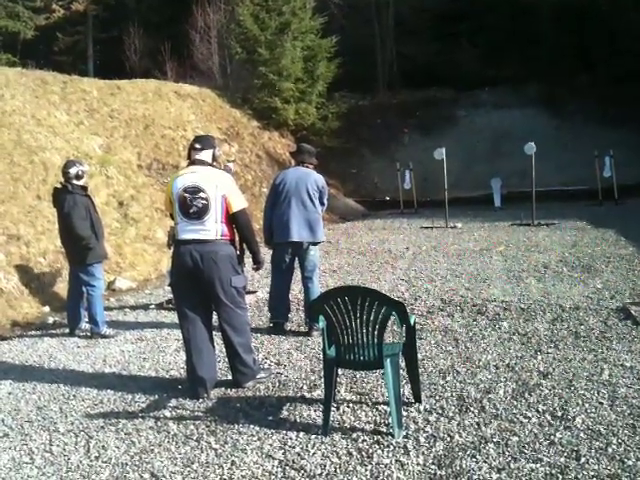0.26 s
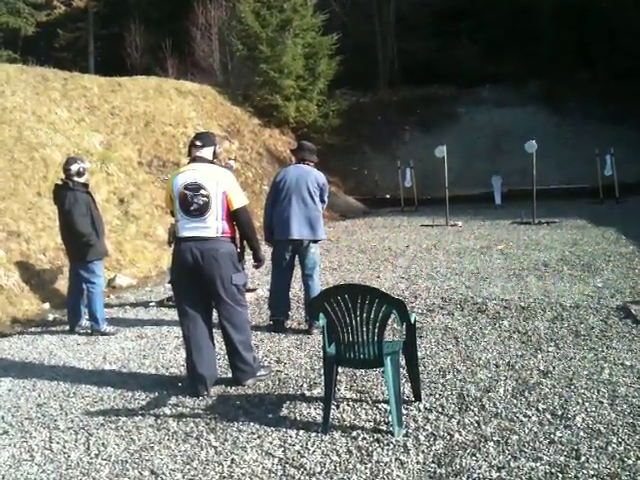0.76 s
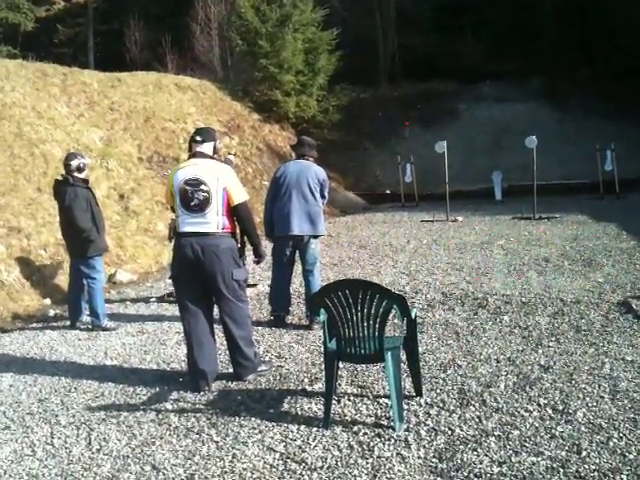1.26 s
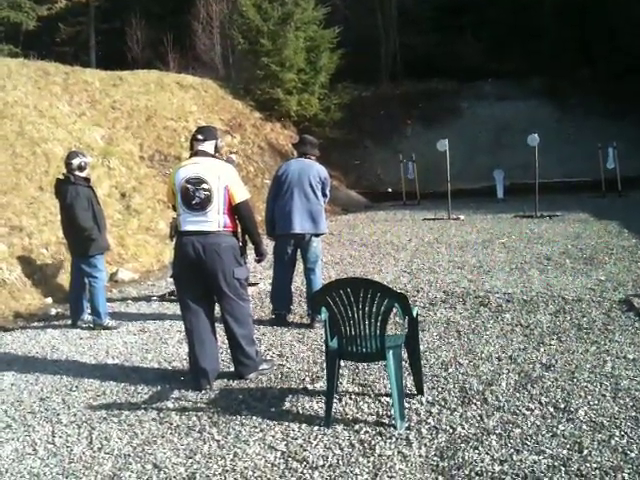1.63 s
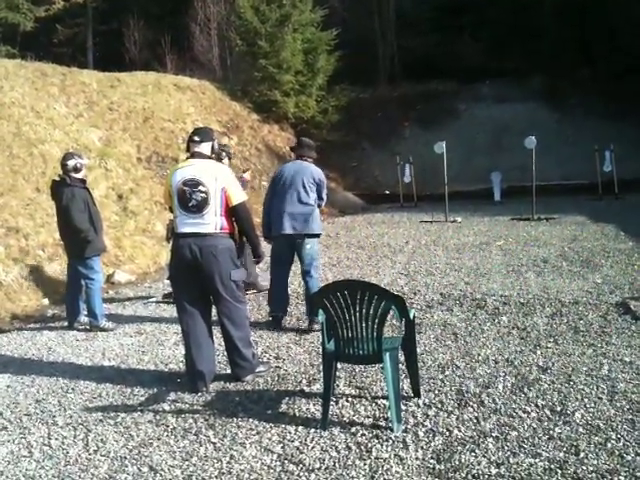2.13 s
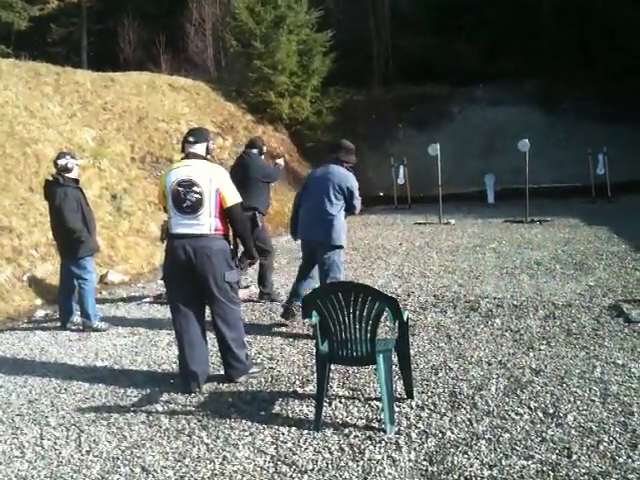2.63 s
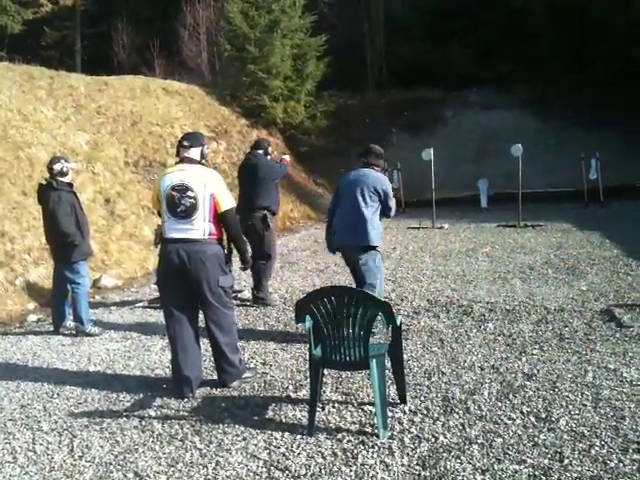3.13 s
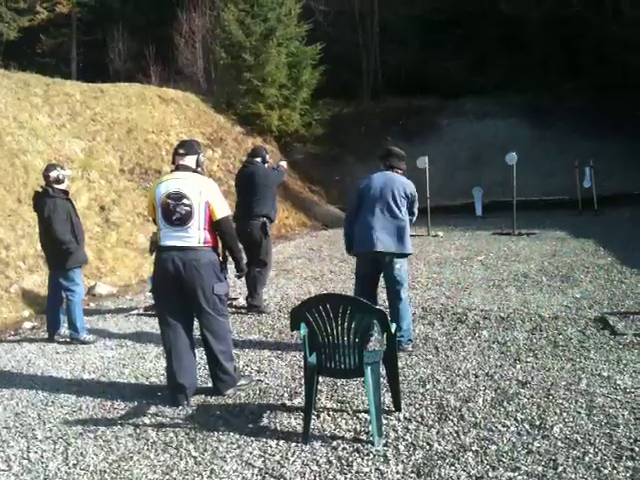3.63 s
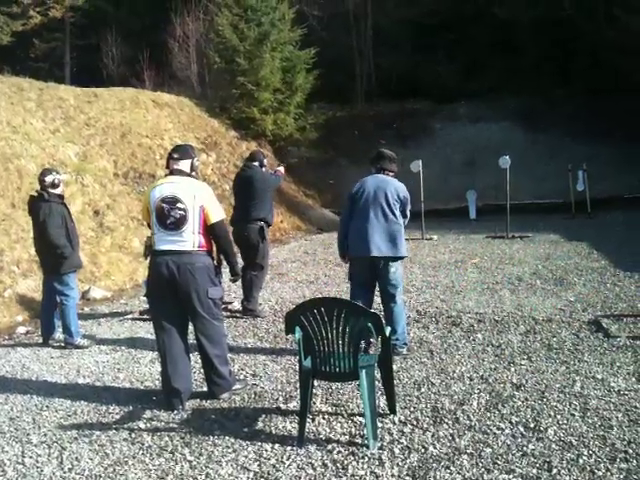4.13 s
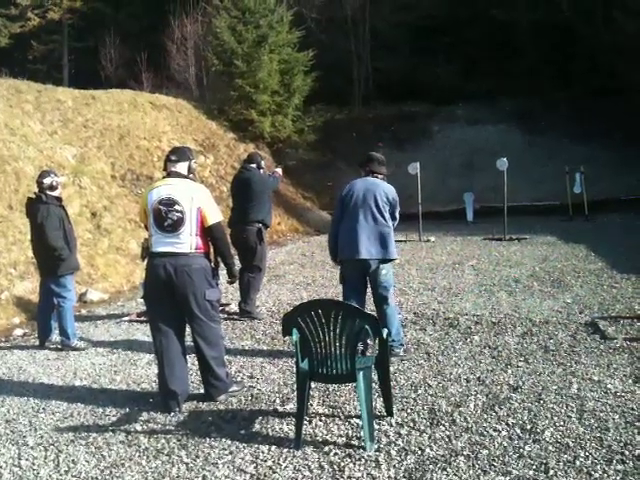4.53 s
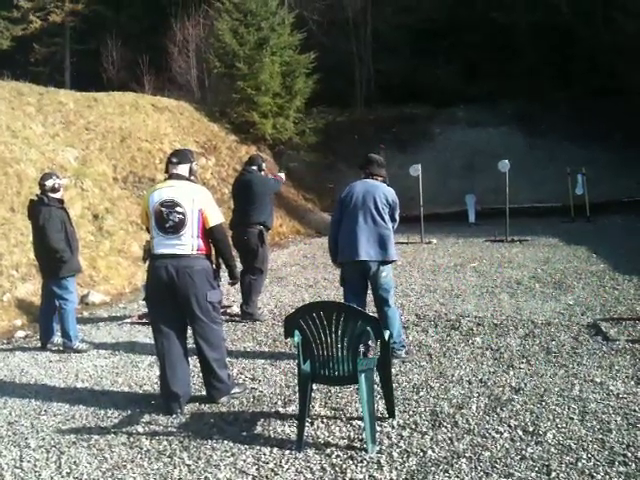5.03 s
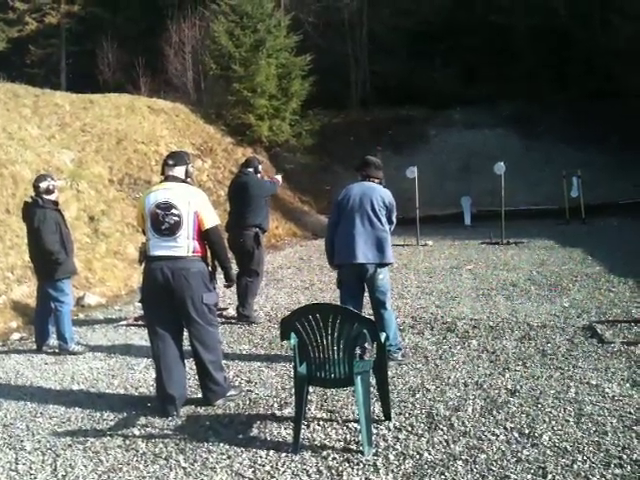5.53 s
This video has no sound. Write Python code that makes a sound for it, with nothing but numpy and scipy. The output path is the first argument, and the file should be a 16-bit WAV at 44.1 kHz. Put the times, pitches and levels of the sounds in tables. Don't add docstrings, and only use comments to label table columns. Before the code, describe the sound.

Close pistol shots crack and overload the microphone, echoing off earth banks and forest, while other guns thump nearby and steel plates ring.

```python
import sys
import numpy as np
from scipy import signal
from scipy.fft import rfft, irfft
from scipy.io import wavfile

SR = 44100
rng = np.random.default_rng(int(sys.argv[2]) if len(sys.argv) > 2 else 0)


def gain_from_db(level_db):
    decades = np.asarray(level_db, float) / 20
    return 10 ** decades


def unload_wav(signal):
    wavfile.write(
        sys.argv[1],
        SR,
        np.round(np.clip(np.atleast_2d(signal).T, -1, 1) * 32767).astype(np.int16),
    )


N = 254898
T = np.arange(N) / SR
BANDS_HZ = 60 * 2 ** np.arange(0, 8.6, .5)


def on_log(table, hz):
    table = np.array(table)
    return np.interp(np.log(hz), np.log(table[:, 0]), table[:, 1])


def bands(noise, colour):
    hz = np.maximum(np.arange(len(noise) // 2 + 1) * SR / len(noise), 1)
    away = np.clip(np.log2(hz / BANDS_HZ[:, None]) * 2, -1, 1)
    coloured = rfft(noise) * gain_from_db(on_log(colour, hz))
    split = irfft(coloured * np.cos(away * np.pi / 2) ** 2, len(noise))
    return split / split.sum(axis=0).std()


def swell(t, rise_s, t60_s):
    t = np.maximum(t, 0)
    rise = np.sin(np.minimum(t / max(rise_s, 1 / SR), 1) * np.pi / 2) ** 2
    return rise * 10 ** (-6 * np.maximum(t - rise_s, 0) / t60_s)


def add(out, sound, start_s):
    i = int(round(start_s * SR))
    out[i:i + len(sound)] += sound[:len(out) - i]


def ring(modes, rise_s, size):
    t = np.arange(size) / SR
    out = np.zeros(size)
    for hz, db, t60_s in modes:
        out += gain_from_db(db) * np.sin(2 * np.pi * hz * t) * np.sqrt(swell(t, rise_s, t60_s))
    return out


def thumps(rows, size):
    out = np.zeros(size)
    for s, push, hz, t60_s in rows:
        add(out, push * ring([(hz, 0, t60_s)], 1 / (3 * hz), size=8192), s)
    return out


# pitch_hz, t60_s
FOREST = [(100, 2), (260, 1.47), (700, 1.67), (2300, 1.38), (4850, 0.91), (9000, 0.64), (12800, 0.49),
          (16000, .4)]


def echoes(t, waves, tails):
    octaves = np.log2(BANDS_HZ[:, None] / 1000)
    power = np.zeros((len(BANDS_HZ), len(t)))
    for s, rise_s, t60_s, db, tilt_db in waves:
        span = slice(*np.searchsorted(t, [s, s + rise_s + 1.5 * t60_s]))
        decay_s = t60_s * 2 ** (-.12 * octaves)
        power[:, span] += gain_from_db(db + tilt_db * octaves) ** 2 * swell(t[span] - s, rise_s, decay_s)
    for s, rise_s, db in tails:
        span = slice(*np.searchsorted(t, [s, s + 2]))
        power[:, span] += gain_from_db(db) ** 2 * swell(t[span] - s, rise_s, on_log(FOREST, BANDS_HZ)[:, None])
    return np.sqrt(power)


# pitch_hz, density_db_per_hz
AIR = [(35, -78.5), (60, -55), (140, -16), (300, -5.5), (460, -6), (800, -0.5), (1400, -6.5), (2350, -5.5),
       (2650, -10), (4700, -9), (6600, -8.5), (9000, -11.5), (12000, -18), (16000, -18.5)]


def scatter(waves, tails):
    return (bands(rng.standard_normal(N), AIR) * echoes(T, waves, tails)).sum(axis=0)


# start_s, end_bank_delay_s, end_bank_db, slopes_db, forest_db
NEAR_SHOTS = [
    (.031, .078, -6.5, -13.5, -19.8),
    (1.405, .074, -11, -7.5, -15.5),
    (3.606, .076, -5.5, -12.5, -19.6),
    (4.738, .084, -12.5, -10, -19.3),
]
# delay_s, rise_s, t60_s, level_db, tilt_db_per_octave
SLOPES = [
    (.039, .024, .17, .1, -3.3),
    (.086, .012, .05, -9, -1.5),
]


def near_gun():
    # delay_s, rise_s, t60_s, level_db, tilt_db_per_octave
    blast, side_banks = (0, .0009, .13, 7, .6), (.031, .015, .23, -3, -.9)
    waves, booms = [], []
    tails = [(-.3, .093, -14)]
    for s, bank_s, bank_db, slopes_db, forest_db in NEAR_SHOTS:
        for delay_s, *shape in (blast, side_banks):
            waves.append((s + delay_s, *shape))
        waves.append((s + bank_s, .003, .2, bank_db, -6))
        for delay_s, rise_s, t60_s, db, tilt_db in SLOPES:
            waves.append((s + bank_s + delay_s, rise_s, t60_s, slopes_db + db, tilt_db))
        tails.append((s + .01, .13, forest_db))
        booms.append((s + .018, .6, 320, .1))
        booms.append((s + bank_s, 1.5 * gain_from_db(bank_db), 316, .1))
    return scatter(waves, tails) + thumps(booms, size=N)


# pitch_hz, density_db_per_hz
QUIET = [(35, -63), (60, -35.5), (91, -22.5), (527, -11.5), (842, -12.5), (5720, -45.5), (8320, -35),
         (16000, -46)]


def hush():
    level_db = -53.5
    return gain_from_db(level_db) * bands(rng.standard_normal(N), QUIET).sum(axis=0)


# start_s, signed_size, pitch_hz, t60_s
LONE_THUMPS = [
    (.5361, -.52, 600, .007),
    (.5368, .28, 300, .036),
    (.5362, -.12, 4300, .003),
    (.5362, -.12, 6500, .003),
    (.5362, -.04, 11500, .002),
]


def lone_gun():
    wave = (.572, .026, .23, -19.5, -1)  # start_s, rise_s, t60_s, level_db, tilt_db_per_octave
    tail = (.537, .16, -24.5)  # start_s, rise_s, level_db
    return scatter([wave], [tail]) + thumps(LONE_THUMPS, size=N)


# start_s, level_db
BAY_SHOTS = [(.6315, 0), (1.0508, -.5), (1.7739, 0), (2.1258, 0), (2.5183, 0), (2.8761, -.5)]
# delay_s, rise_s, t60_s, level_db, tilt_db_per_octave
BAY_WAVES = [(0, 0.00054, .02, -16.5, 3), (.004, 0.0023, 0.3, -14.5, -4.5), (.037, 0.0026, 0.03, -19, 2),
             (0.041, 0.0038, 0.069, -12, -4), (.085, .02, .1, -16, -1), (.103, .004, .04, -19, -1),
             (.12, 0.0087, 0.097, -10, 0)]
# delay_s, signed_size, pitch_hz, t60_s
BAY_THUMPS = [(0, -0.98, 730, 0.0091), (.0004, 0.41, 1270, 0.015), (.008, .25, 1100, 0.033),
              (.0036, 1.19, 298.5, 0.038), (.006, 0.34, 680, 0.024), (.02, 0.34, 556, 0.036),
              (.039, .4, 700, .04), (.044, 0.23, 332, 0.056), (.108, -0.014, 500, .03)]
# pitch_hz, level_db
BAY_SHADE = [(250, -5), (600, .1), (8000, .1), (12000, -3)]


def next_bay():
    out, t = np.zeros(N), T[:65536]
    tail = (0.032, 0.12, -18.5)  # delay_s, rise_s, level_db
    gain = echoes(t, BAY_WAVES, [tail]) * gain_from_db(on_log(BAY_SHADE, BANDS_HZ))[:, None]
    ground = rng.standard_normal(len(t))
    same = .3 + .6 * np.exp(-t / .05)
    thump = thumps(BAY_THUMPS, size=len(t))
    for s, db in BAY_SHOTS:
        noise = same * ground + np.sqrt(1 - same ** 2) * rng.standard_normal(len(t))
        scattered = (bands(noise, AIR) * gain).sum(axis=0)
        add(out, gain_from_db(db) * (thump + scattered), s)
    return out


# start_s, pitch_hz, level_db, t60_s
BAY_PLATES = [(.662, 4470, -15, .029), (.7, 6200, -44, .88), (1.093, 3660, -19.5, .15),
              (1.094, 3801, -27, .9), (1.092, 4530, -21.5, .13), (1.18, 6298, -23.5, .45),
              (1.25, 8683, -34, .4), (1.838, 6160, -26, .58), (1.838, 3570, -19, .07),
              (1.839, 4320, -22, .15), (2.175, 5399, -29, 1.1), (2.175, 5889, -32, 1.5),
              (2.175, 5200, -35, 1.5), (2.25, 3531, -30.5, .88)]


def bay_plates():
    out = np.zeros(N)
    for s, hz, db, t60_s in BAY_PLATES:
        add(out, ring([(hz, db, t60_s)], .002, size=SR), s)
    return out


# start_s, t60_s, level_db
IMPACTS = [(.663, .034, -8), (1.093, .1, -20), (1.142, .02, -16), (1.479, .24, -4), (1.552, .11, -11),
           (1.839, .06, -14), (1.879, .013, -15), (2.178, .12, -21), (2.59, .012, -24), (2.947, .015, -17),
           (4.819, .01, -1)]


def impacts():
    rise_s, tilt_db = .001, .3
    return scatter([(s, rise_s, t60_s, db, tilt_db) for s, t60_s, db in IMPACTS], [])


def strike(pitches_hz, modes, start_s, rise_s):
    out = np.zeros(N)
    add(out, ring(np.column_stack([pitches_hz, modes]), rise_s, size=SR + 4096), start_s)
    return out


FAR_PLATE_HZ = [1147, 4237, 5265, 5453, 7241, 7838, 10840, 11460, 12730, 7205, 7858]
# level_db, t60_s
FAR_PLATE = [(-17.5, 0.7), (-20.5, 0.61), (-10, 0.49), (-19, .6), (-8.5, .3), (-8, 0.33), (-17.5, 0.12),
             (-21, 0.3), (-33, .3), (-14, 0.13), (-11.5, 0.3)]


def far_plate():
    return strike(FAR_PLATE_HZ, FAR_PLATE, start_s=1.485, rise_s=.015)


def grit():
    strength_db = 3.1 * np.repeat(rng.exponential(size=N // 32 + 1), 32)[:N]
    grains = rng.standard_normal(N) * gain_from_db(strength_db)
    bright = signal.butter(2, [4000, 13000], "bandpass", fs=SR, output="sos")
    grains = signal.sosfilt(bright, grains)
    return grains / grains.std()


# start_s, level_db
CRUNCHES = [
    (3.367, -64),
    (3.395, -58),
    (3.422, -66),
    (3.485, -43),
    (3.543, -45.5),
    (3.571, -53.5),
]


def boots():
    power = np.zeros(N)
    for s, db in CRUNCHES:
        t60_s = .11 * 2 ** ((db + 52) / 8)
        power += gain_from_db(db) ** 2 * swell(T - s, .006, t60_s)
    return grit() * np.sqrt(power)


# start_s, ring_db, tick_db
BOUNCES = [(4.410, -46, -40.5), (4.502, -58, -56), (4.55, -54, -47), (4.647, -56.5, -53.5),
           (4.654, -50.5, -59), (4.676, -68, -58), (4.704, -69, -61), (5.331, -73, -54), (5.554, -77, -49),
           (5.675, -78.5, -64), (5.776, -42, -37)]
# pitch_hz, level_db, t60_s
CASE = [(8120, 3.5, .2), (8250, -11, .15), (8760, -9, 0.12), (9300, -15, 0.066), (11040, -19, .08),
        (11830, -18, 0.088), (13770, -11.5, 0.114)]


def spent_cases():
    out, power = np.zeros(N), np.zeros(N)
    for s, ring_db, tick_db in BOUNCES:
        blow_db = 3 * rng.standard_normal(len(CASE))
        modes = [(hz, db + b, t60_s) for (hz, db, t60_s), b in zip(CASE, blow_db)]
        add(out, gain_from_db(ring_db) * ring(modes, 0.00027, size=SR // 2), s)
        power += gain_from_db(tick_db) ** 2 * swell(T - s, 0.000455, 0.02)
    return out + grit() * np.sqrt(power)


NEAR_PLATE_HZ = [7354, 7361, 7178, 10720, 10928, 8694, 8759, 9141, 9577, 9792, 11660, 12830, 13150, 14540,
                 14900, 15550]
# level_db, t60_s
NEAR_PLATE = [(14.5, 0.18), (-18.5, 0.66), (-8.5, .2), (-2, 0.181), (-14, .4), (-15, .3), (-8, 0.31),
              (-36.5, .5), (-31, 1.2), (-30, 0.56), (-11.5, 0.28), (-32, .2), (-42, 1.2), (-34, 1.0),
              (-36, .6), (-29, 1.0)]
SWING_HZ = [4000, 4012, 4527, 4560, 4764, 5286, 6368]
# level_db, t60_s
SWING = [(-10, 0.48), (-31, 1.2), (-14, 1.64), (-19, 1.44), (-24, .6), (-25, 0.39), (-19, 0.43)]


def near_plate():
    out = strike(NEAR_PLATE_HZ, NEAR_PLATE, start_s=4.7893, rise_s=.0005)
    out += strike(SWING_HZ, SWING, start_s=4.812, rise_s=.042)
    add(out, ring([(10944, -39, .4)], .1, size=SR), 5.05)
    return out


def scene():
    guns = near_gun() + lone_gun() + next_bay()
    targets = bay_plates() + impacts() + far_plate() + near_plate()
    return (guns + targets + boots() + spent_cases() + hush())[None]


def roll_off(x):
    return signal.sosfilt(signal.butter(12, 16830, fs=SR, output="sos"), x)


def record(dry):
    thin = signal.sosfilt(signal.butter(2, 150, "highpass", fs=SR, output="sos"), dry)
    top, knee = .68, 6.0
    clipped = thin / (1 + np.abs(thin / top) ** knee) ** (1 / knee)
    rounded = signal.sosfilt(signal.butter(1, 12000, fs=SR, output="sos"), clipped)
    return roll_off(rounded)


dry = scene()
out = record(dry)
unload_wav(out)
```